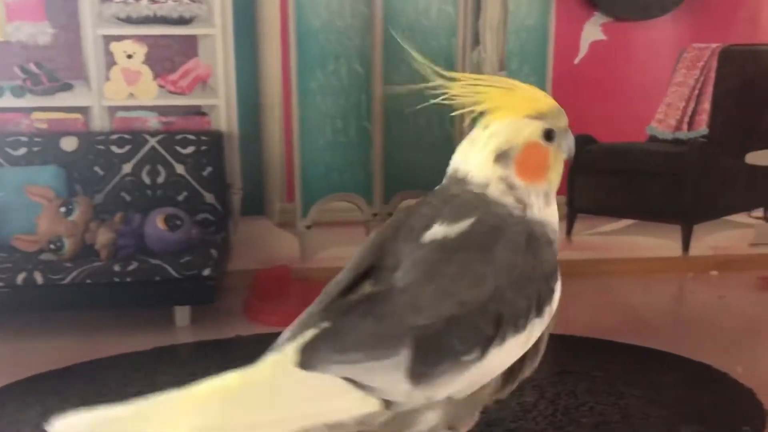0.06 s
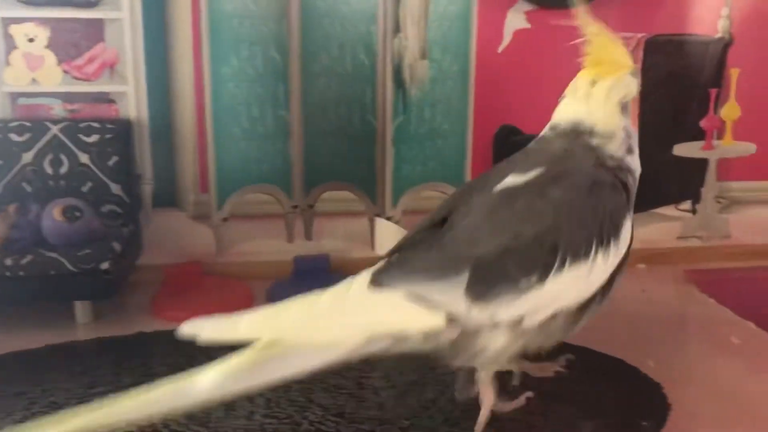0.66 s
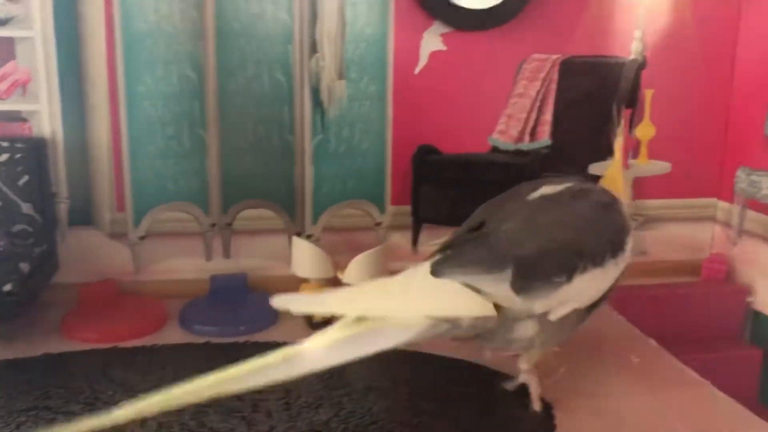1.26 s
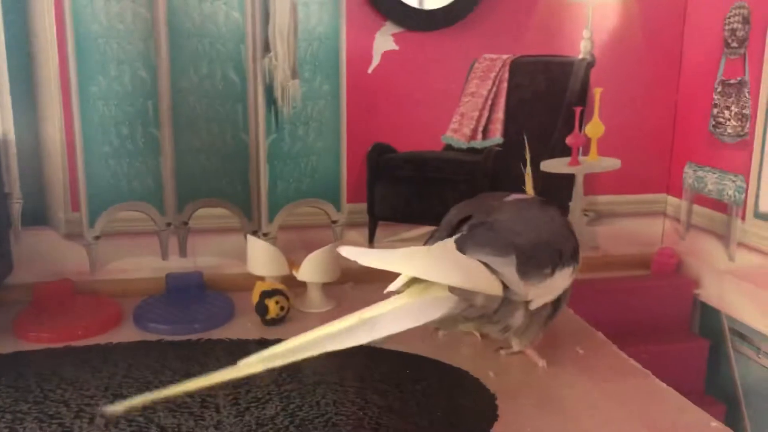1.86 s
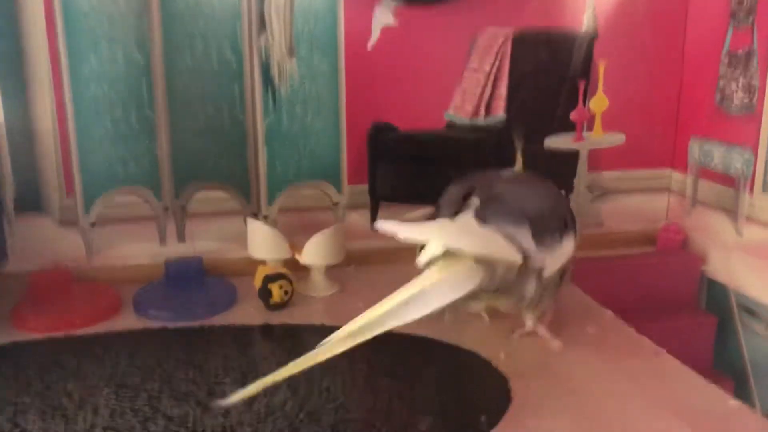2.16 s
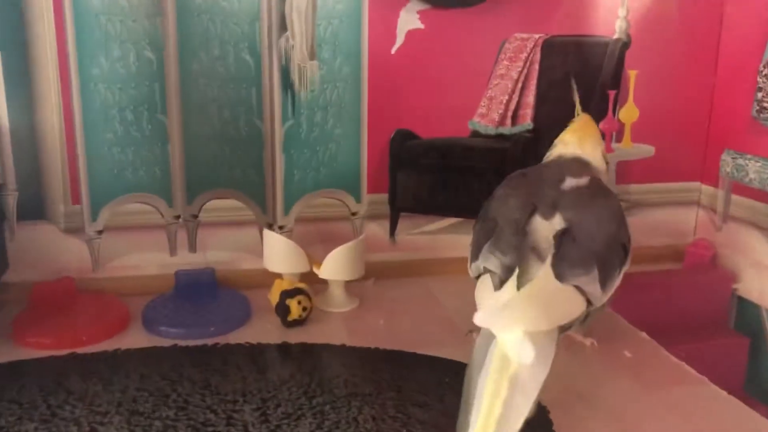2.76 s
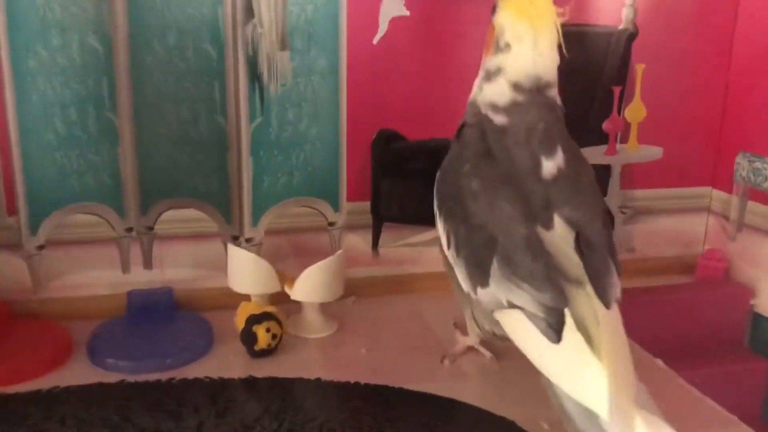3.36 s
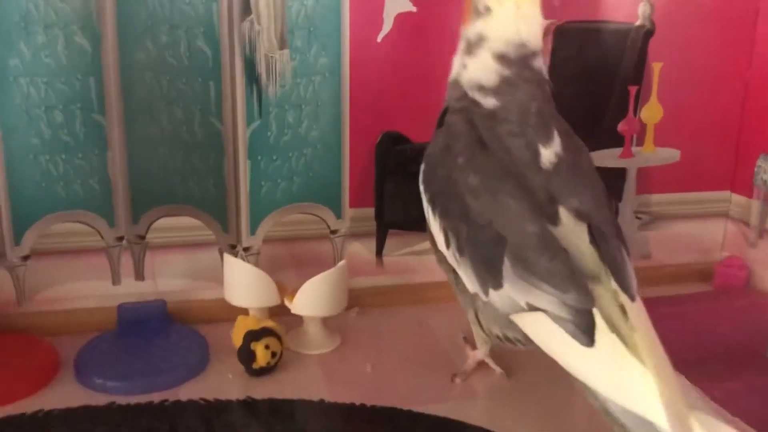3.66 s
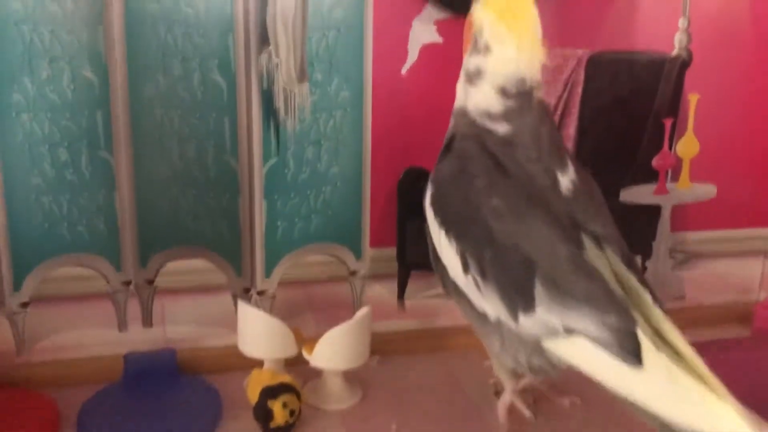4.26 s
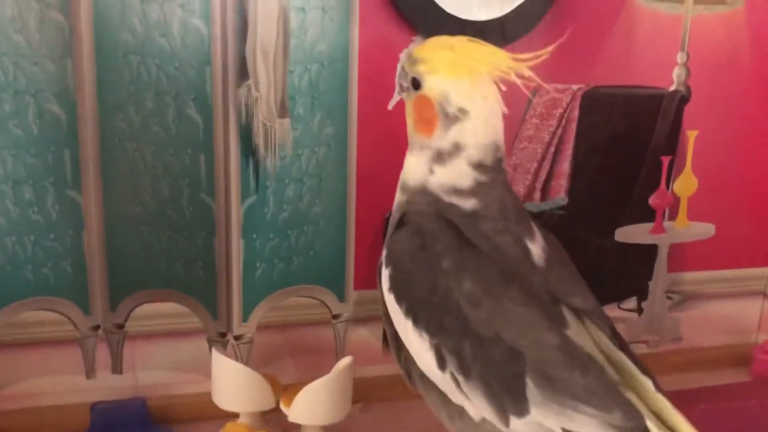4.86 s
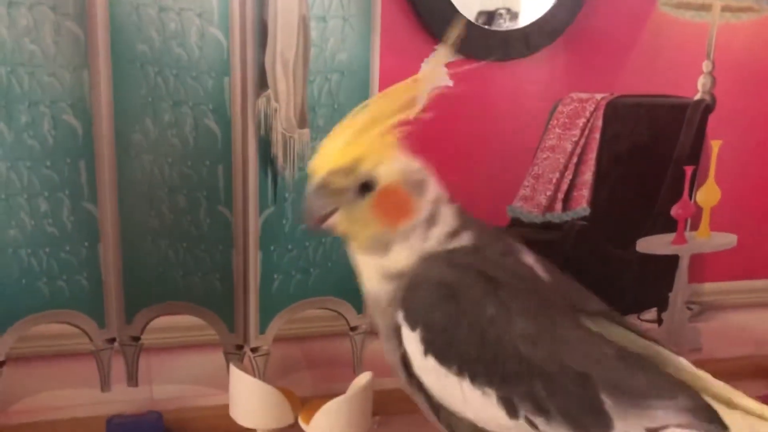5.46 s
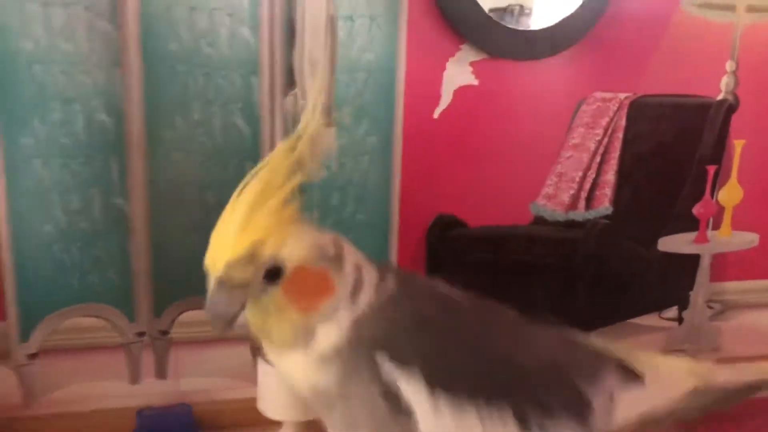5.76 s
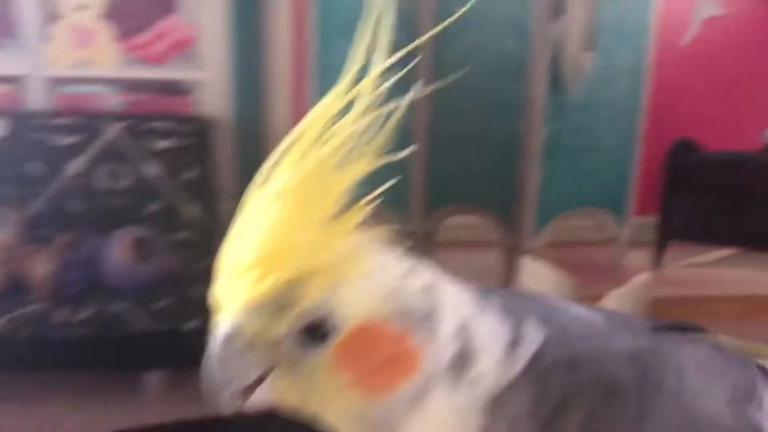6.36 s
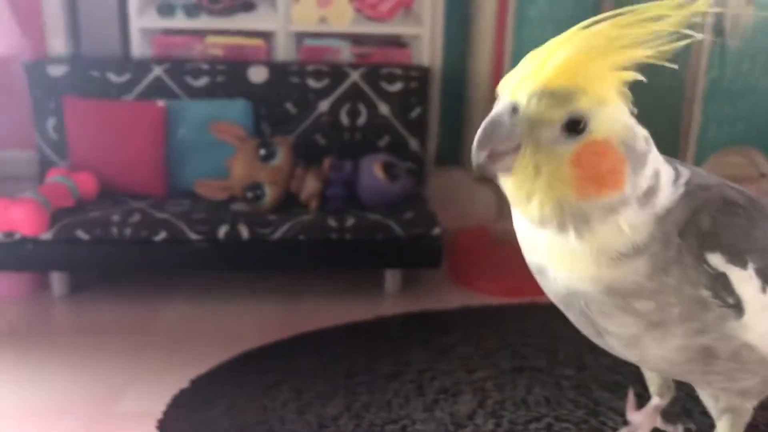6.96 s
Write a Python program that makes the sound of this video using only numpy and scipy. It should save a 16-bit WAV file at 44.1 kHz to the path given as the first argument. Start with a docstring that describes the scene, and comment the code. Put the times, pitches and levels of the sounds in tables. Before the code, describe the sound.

A cockatiel walks on a dollhouse's hard plastic floor, close to the microphone in a quiet room. Its claws make light, sharp ticks as they land and tiny scrapes as they lift, and each step faintly rings the hollow panel. From the start to about 1.6 seconds the taps come in quick, uneven clusters. They then thin out to single steps near 2.3, 3.1 and 3.8 seconds. Between 4.0 and 4.4 seconds the house shell gives a run of soft, low thumps, followed by a couple of ticks and a short lull. At about 5.5 seconds a claw clinks a small stiff toy, and the firmest steps and scratches follow until about 6.6 seconds. Among them, at 6.2 seconds, loose plastic gives one close, hollow knock. Low room tone, faint hiss and a slight room echo lie behind everything, until the end at about 7 seconds.

```python
"""Cockatiel in a dollhouse

A quiet room, the microphone close to a cockatiel walking on a dollhouse's hard plastic floor.
Its claws tick as they land and scrape as they lift; each foot's weight rings the floor panel.
Midway the house shell gives a run of soft thumps. Near the end a claw clinks a small stiff toy and
loose plastic gives a close, hollow knock. Behind it all lie the room's tail, low air and faint hiss."""
import sys
import numpy as np
from scipy import signal
from scipy.fft import rfft, irfft
from scipy.io import wavfile
from scipy.ndimage import uniform_filter1d

SR = 44100
rng = np.random.default_rng(int(sys.argv[2]) if len(sys.argv) > 2 else 0)


def wrap_up_sound(samples):
    """Save the sound to the file named by the first command line argument, as 16-bit audio."""
    columns = np.atleast_2d(samples).T
    # keep every value between -1 and 1, then stretch to whole-number steps
    tamed = np.clip(columns, -1, 1)
    steps = np.round(tamed * 32767).astype(np.int16)
    wavfile.write(sys.argv[1], SR, steps)


N = 313992

# steps, claw and weight landing together: start_s, claw_db, middle_re_claw_db, skid (0-1),
# early_toe_lead_s (0 for none), claw_ring_hz, weight_db, clack_re_weight_db, floor_hz
STEPS = [(0.1367, -63, -1.5, .2, 0, 4590, -55, 0, 394), (0.3427, -32, -14, .22, .007, 4100, -58.5, 4, 355),
         (0.5993, -36, -12, .33, .0163, 8900, -54.5, 1, 338),
         (0.8055, -31.5, -13, .42, .005, 7100, -58.5, 1, 328),
         (1.0866, -33, -15, .2, .0063, 3400, -59.5, 5, 340),
         (1.3954, -37.5, -13, .08, 0, 5660, -49, -.5, 330),
         (1.5755, -46.5, -6.5, .35, .0065, 4160, -41.5, 0, 375),
         (2.2686, -40, -12.5, .03, 0, 5700, -48, -2, 332), (3.0529, -37.5, -12, .3, 0, 6550, -63, 1.5, 352),
         (3.828, -32, -11, .03, 0, 4370, -70, 12, 358), (4.4444, -39, -15, .88, 0, 5400, -72, 0, 400),
         (4.464, -44, -2.5, .08, 0, 9100, -58, 3, 406), (5.531, -46, -4, .1, 0, 6800, -42.5, -9, 265),
         (5.5976, -28, -12, .95, 0, 5220, -45.5, -3, 268),
         (5.7715, -27.5, -10, .42, 0, 7300, -44.5, -4, 268),
         (5.9897, -28.5, -12.5, .9, 0, 5560, -52, 4.5, 307),
         (6.1737, -30, -9.5, .33, .0108, 1980, -66, 0, 310),
         (6.4182, -32.5, -10, .27, .0088, 3980, -49, .5, 322),
         (6.6725, -64, -4, .2, 0, 4700, -54, 1.5, 434)]
# a sole settling without its claws: start_s, weight_db, clack_re_weight_db, floor_hz
SOLES = [(0.206, -68, 7, 418), (2.298, -52, 1.5, 450), (3.07, -63, 3.5, 312), (4.52, -65.5, -2, 352),
         (4.613, -66, -6, 274), (4.69, -66, -5, 326), (5.012, -71.5, 1.5, 330), (5.268, -56, -11, 280),
         (5.306, -68, 2, 368)]
# a lone claw tip touching, no weight on it: start_s, level_db, skid (0-1)
TOUCHES = [(0.11, -64, .35), (0.4377, -48.5, .45), (0.607, -44, .17), (0.655, -57, .15), (0.885, -57, .08),
           (1.1152, -54.5, .25), (1.2992, -49.5, .17), (1.383, -66, .15), (1.502, -63, .2),
           (2.2084, -53, .05), (2.986, -56, .07), (3.8434, -43.5, .45), (4.013, -72, .3), (4.267, -70, .3),
           (4.5051, -57.5, .25), (5.31, -70, .15), (5.642, -52.5, .7)]
# a lifting claw catches, then drags: start_s, length_s, rasp_db, middle_re_rasp_db (before trim), catch_db
DRAGS = [(0.233, .011, -52, -15, -55), (0.315, .024, -53.5, -21, -66), (0.429, .022, -55, -10, -59),
         (0.6769, .018, -51, -18, -45.5), (0.9015, .015, -53.5, -14.5, -64), (1.2896, .016, -58, -9, -50.5),
         (3.661, .046, -69.5, -9, -76), (3.7264, .028, -59, -15, -52), (4.317, .055, -67.5, -5.5, -75),
         (4.395, .013, -53, -13, -52), (4.945, .06, -74.5, 0, -78), (5.419, .011, -63, -6, -72),
         (5.4472, .022, -60, -1, -55), (5.618, .038, -55.5, -12, -64), (5.678, .04, -72, 11, -76),
         (5.776, .008, -35, -9.5, -48), (5.83, .016, -43.5, -14, -57), (6.0425, .012, -52, -18, -53),
         (6.283, .015, -51, -14, -46), (6.5552, .017, -51.5, -12, -52)]
# colour of a claw on plastic: frequency_hz, gain_db
CLAW_COLOUR = [(800, -9), (2000, 1), (3500, -3.5), (5000, -4), (7300, -1), (8300, -0.5), (10700, 3),
               (12500, -0.5), (14500, -2), (16000, -9.5)]
# modes of the floor panel: pitch_hz, level_db, t60_s
FLOOR_MODES = [(138.4, -9, 0.137), (199, -5, 0.13), (263.8, 1.5, 0.11), (300, -3, 0.083), (402.6, -6, 0.13),
               (465, -7.5, 0.11), (521, -6, 0.099), (615, -5.5, 0.091), (730, -5.5, 0.061),
               (826.6, -7.5, 0.097), (912, -5, 0.081), (1042, -5, 0.057), (1179, -10.5, 0.091),
               (1314, -8, 0.058), (1628, -11, 0.055), (1786, -23, .05)]
# soft bumps of the whole house: start_s, body_db, bass_re_body_db, click_db
THUMPS = [(3.977, -48.5, 1, -56.5), (4.052, -55, 4, -78), (4.143, -54, -3, -80), (4.219, -47, -2, -67),
          (4.302, -47, -6, -69), (4.335, -52.5, -15, -76)]
# modes of the house shell: pitch_hz, level_db, t60_s
SHELL_MODES = [(85, -5.5, 0.12), (113, -3.5, 0.14), (147, -8, .08), (179, 0, 0.11), (253, -3, 0.061),
               (339, -4, 0.049), (382, 0, 0.08), (534, -8, 0.073), (621, -1.5, 0.069), (699, -4.5, 0.063),
               (800, -1.5, 0.064), (920, -3, 0.092), (1240, -11, .05)]
# a claw catches a small stiff toy: start_s, gain_db
CLINK = (5.5256, -38)
# modes of that toy: pitch_hz, level_db, t60_s
CLINK_MODES = [(2340, -6.5, 0.078), (3400, -11, 0.058), (5850, -14, 0.048), (6640, -7.5, 0.071),
               (7900, -10, .04), (11980, 0, .03), (13450, -4, .03), (15600, 3, .03)]
# a hollow knock near the microphone: start_s, gain_db
KNOCK = (6.1748, -32.7)
# modes of the knocked plastic: pitch_hz, level_db, t60_s
KNOCK_MODES = [(298, -15, 0.12), (604, -8, 0.034), (700, -6.5, 0.058), (790, -0.5, .035), (870, 0.5, 0.048),
               (932, -1, 0.058), (1067, -0.5, 0.043), (1190, -4.5, 0.032), (1560, -0.5, 0.026),
               (1805, 2, 0.029), (1890, 0, 0.023), (2191, -11, 0.032), (2760, -6, 0.033)]
# decay of the room's tail: frequency_hz, t60_s
ROOM_DECAY = [(150, 0.7), (800, .5), (4000, 0.64), (9000, 0.4), (15000, .4)]
# level of the room's tail: frequency_hz, gain_db
ROOM_COLOUR = [(150, -5.5), (800, -13.5), (4000, -17.5), (9000, -21), (15000, -25.5)]
# spectrum of the room's air: frequency_hz, relative_db
AIR_COLOUR = [(15, -52), (25, -37), (48, -6.5), (86, -5), (116, -0.5), (165, -7), (200, -6.5), (235, -11.5),
              (352, -16.5), (587, -21), (710, -25.5), (769, -23.5), (1390, -33.5), (1680, -32),
              (15800, -46.5)]
# faint hiss that swells as the bird moves: time_s, level_db (before trim)
HISS_SWELL = [(0.0, -78), (0.18, -77), (0.54, -73), (1.09, -77), (1.47, -75), (1.7, -79), (2.97, -78),
              (3.9, -73), (4.0, -76), (4.26, -76), (4.38, -73), (4.7, -78), (5.31, -77), (5.49, -76),
              (5.65, -66), (6.9, -78), (7.12, -78)]

USUAL_WEIGHT_DB = -52  # an ordinary footfall
FAINT_DB = -54  # below this a claw's touch grows duller


def amp(db):
    """Decibels to gain."""
    return 10 ** (np.asarray(db) / 20)


def unit_rms(x, span_s=None):
    """Scales to rms 1 over the first span_s, or over all."""
    head = x if span_s is None else x[:int(span_s * SR)]
    return x / np.sqrt(np.mean(head ** 2) + 1e-20)


def curve_at(points, hz):
    """Reads a table on a log-frequency axis."""
    points_hz, values = np.transpose(points)
    return np.interp(np.log(hz + 1), np.log(points_hz), values)


def hump(hz, centre_hz, octaves):
    """A bell curve of height 1 on a log-frequency axis."""
    return np.exp(-(np.log2((hz + 1) / centre_hz) / octaves) ** 2)


def fade(t, t60):
    """Exponential decay, 60 dB in t60 seconds."""
    return np.exp(-np.log(1000) * t / t60)


def add(mix, start_s, sound):
    """Mixes a sound in at start_s."""
    part = mix[max(round(start_s * SR), 0):][:len(sound)]
    part += sound[:len(part)]


def band(x, lo_hz, hi_hz, order=3):
    """Causal band-pass."""
    sos = signal.butter(order, [lo_hz, min(hi_hz, .49 * SR)], "band", fs=SR, output="sos")
    return signal.sosfilt(sos, x)


def coloured(x, db_at, size=2048):
    """Minimum-phase filter whose gain in dB is db_at(hz)."""
    log_gain = np.log(amp(db_at(abs(np.fft.fftfreq(size, 1 / SR)))))
    taps = np.fft.ifft(np.exp(np.conj(signal.hilbert(log_gain)))).real
    return signal.fftconvolve(x, taps[:size // 2])[:len(x)]


def ring(modes, t, scatter_db, detune):
    """Modes struck at a random spot, which changes their weights and signs."""
    hz, db, t60 = np.transpose(modes)[:, :, None]
    weight, shift, side = rng.standard_normal((3, len(modes), 1))
    waves = np.sign(side) * np.sin(2 * np.pi * hz * (1 + detune * shift) * t)
    return (amp(db + scatter_db * weight) * fade(t, t60) * waves).sum(0)


def claw_contacts(toe_db=-12, toe_skid=.25, touch_skid=.16, light_middle_db=-12.5, click_ring_hz=3000):
    """Every claw strike and thump click: start_s, level_db, middle_re_treble_db, skid, ring_hz."""
    firm = [(s, db, middle_db, skid, hz) for s, db, middle_db, skid, _, hz, *_ in STEPS]
    early_toes = [(s - lead_s, db + toe_db, toe_skid) for s, db, _, _, lead_s, *_ in STEPS if lead_s > 0]
    catches = [(s, catch_db, touch_skid) for s, *_, catch_db in DRAGS]
    clicks = [(s, click_db, 3, touch_skid, click_ring_hz) for s, *_, click_db in THUMPS]
    light = []
    for start_s, db, skid in early_toes + TOUCHES + catches:
        middle_db = light_middle_db + .4 * max(FAINT_DB - db, 0)
        ring_hz = rng.choice(firm)[-1]  # rings like any one of the steps
        light.append((start_s, db, middle_db, skid, ring_hz))
    return firm + clicks + light


def claw_taps(chatter_s=.006, spike=19, rebound=.3, ripple_db=2, ring_db=6, walls_db=-16):
    """A hard tip strikes and chatters; dense plastic modes and the close walls smear it briefly."""
    out, t = np.zeros(N), np.arange(SR // 8) / SR
    grid_hz = np.linspace(1, SR / 2, 80)
    for start_s, db, middle_db, skid, ring_hz in claw_contacts():
        clean = (1 - skid) ** 5  # a clean hit is sharper and brighter than a skid
        sharpness = .1 + .55 * clean
        db_per_octave = 2.2 + 5.3 * clean - .45 * max(FAINT_DB - db, 0)
        tilt = lambda hz: db_per_octave * np.log2(np.maximum(hz, 5000) / 9000)
        # each claw and spot has one clear resonance among lesser peaks and dips
        ripple = np.column_stack([grid_hz, ripple_db * rng.standard_normal(len(grid_hz))])
        spot = lambda hz: curve_at(ripple, hz) + ring_db * hump(hz, ring_hz, octaves=.07)
        after_chatter = np.maximum(t - chatter_s * skid, 0)
        smear = fade(after_chatter, t60=.021) + amp(walls_db) * fade(after_chatter, t60=.06)
        crack = 7 * sharpness ** 2 * fade(t, t60=.002)
        tick = rng.standard_normal(len(t)) * (smear + crack)
        tick[:2] += spike * sharpness * np.array([1, -.9])  # first contact: a push and its release
        add(tick, rng.uniform(.0006, .003), rebound * tick)
        tick = coloured(tick, lambda hz: curve_at(CLAW_COLOUR, hz) + spot(hz) + tilt(hz))
        middle = rng.standard_normal(len(t)) * fade(after_chatter, t60=.051)
        middle[0] += spike * sharpness / 2
        middle = coloured(middle, spot)
        add(out, start_s, amp(db) * unit_rms(band(tick, 4440, 20000), span_s=.006))
        add(out, start_s, amp(db + middle_db) * unit_rms(band(middle, 1280, 5580), span_s=.0047))
    return out


def claw_scrapes(slips_per_s=2500, spread_db=3, middle_trim_db=-1):
    """A dragged claw slips in many tiny clicks, each ringing the plastic briefly."""
    out = np.zeros(N)
    for start_s, length_s, db, middle_db, _ in DRAGS:
        t = np.arange(int((length_s + .05) * SR)) / SR
        sizes = amp(spread_db * np.minimum(rng.exponential(1, len(t)), 4)) * rng.choice([-1, 1], len(t))
        slips = sizes * (rng.random(len(t)) < slips_per_s / SR) * (t < length_s)
        plastic = rng.standard_normal(len(t)) * fade(t, t60=.037)
        plastic[0] += 8  # the slip's own click
        rasp = signal.fftconvolve(slips, plastic)[:len(t)]
        treble = band(coloured(rasp, lambda hz: curve_at(CLAW_COLOUR, hz)), 3000, 20000)
        middle = band(rasp, 650, 3300)
        add(out, start_s, amp(db) * unit_rms(treble, length_s))
        add(out, start_s, amp(db + middle_db + middle_trim_db) * unit_rms(middle, length_s))
    return out


def floor_loads(soft_hz=760, hard_hz=1180, hard_margin_db=15.5, sag_octaves_per_db=.015):
    """Every load on the floor: start_s, weight_db, clack_re_weight_db, floor_hz, clack_hz."""
    steps = []
    for start_s, claw_db, *_, weight_db, clack_db, floor_hz in STEPS:
        # a heavier step clacks lower, but one led by its claw clacks high
        sagged_hz = soft_hz * 2 ** (-sag_octaves_per_db * (weight_db - USUAL_WEIGHT_DB))
        clack_hz = hard_hz if claw_db - weight_db > hard_margin_db else sagged_hz
        steps.append((start_s, weight_db, clack_db, floor_hz, clack_hz))
    return steps + [(*sole, soft_hz) for sole in SOLES]


def blow(sound, body_db, bass_db, clack_db):
    """The softness of the contact shares a blow out: bass and clack are set relative to the body."""
    registers = [(bass_db, band(sound, 65, 195)), (0, band(sound, 186, 618)),
                 (clack_db, band(sound, 560, 1830))]
    return amp(body_db) * sum(amp(db) * unit_rms(part, span_s=.027) for db, part in registers)


def footfalls(weak_gain=.68, press_s=.0015, floor_lift_db=8.5, clack_lift_db=5, octaves=.42):
    """The bird's weight rings the floor panel: strong modes among many weak ones, favoured by the spot."""
    out, t = np.zeros(N), np.arange(SR // 3) / SR
    for start_s, db, clack_db, floor_hz, clack_hz in floor_loads():
        bass_db = -8.5 - .45 * (db - USUAL_WEIGHT_DB)  # heavier steps favour the body
        weak = band(rng.standard_normal(len(t)), 207, 1300, order=1) * fade(t, t60=.088)
        strong = ring(FLOOR_MODES, t, scatter_db=1.5, detune=.017)
        panel = unit_rms(strong) + weak_gain * unit_rms(weak)
        panel *= 1 - np.exp(-t / press_s)  # the padded toe takes a moment to press
        spot = lambda hz: (floor_lift_db * hump(hz, floor_hz, octaves)
                           + clack_lift_db * hump(hz, clack_hz, octaves))
        add(out, start_s, blow(coloured(panel, spot), db, bass_db, clack_db))
    return out


def house_thumps(settle_s=.0115, settle_gain=.46, rattle_gain=.32):
    """The shell is bumped at one spot; each time it settles with a second bump and loose parts rattle."""
    out, t = np.zeros(N), np.arange(SR // 3) / SR
    shell = unit_rms(ring(SHELL_MODES, t, scatter_db=1, detune=.004))
    for start_s, db, bass_db, _ in THUMPS:
        rattle = band(rng.standard_normal(len(t)), 100, 1300, order=1) * fade(t, t60=.12)
        bump = shell + rattle_gain * unit_rms(rattle)
        add(bump, settle_s * rng.uniform(.916, 1.094), settle_gain * shell)
        add(out, start_s, blow(bump, db, bass_db, clack_db=-9.5))
    return out


def struck_plastic(event, modes):
    """One hard blow on a loose piece of plastic, too small to radiate bass."""
    out, t = np.zeros(N), np.arange(SR // 4) / SR
    start_s, db = event
    piece = ring(modes, t, scatter_db=-1, detune=.0023)
    add(out, start_s, amp(db) * band(piece, 300, 20000, order=2))
    return out


def fidgets(ticks_per_s=12, softest_db=-77.5, spread_db=2.2):
    """Toes and feathers keep making ticks, barely audible even this close."""
    t = np.arange(SR // 16) / SR
    onsets = rng.random(N) < ticks_per_s / SR
    sizes = amp(softest_db + spread_db * np.minimum(rng.exponential(1, N), 3))
    burst = rng.standard_normal(len(t)) * fade(t, t60=.035)
    tick = band(coloured(burst, lambda hz: curve_at(CLAW_COLOUR, hz) / 2), 1000, 20000)
    return signal.fftconvolve(onsets * sizes, unit_rms(tick, span_s=.0045))[:N]


def shuffle(stroke_db=3, stroke_s=.025, rest_db=-83, step_db=-75, follow=.55, rise_t60=.15, fall_t60=1.3):
    """Dull, uneven brushing carried by the floor panel; it swells around each shift of weight."""
    t, knots = np.arange(N) / SR, np.arange(0, N / SR, stroke_s)
    brush = unit_rms(band(rng.standard_normal(N), 350, 1400, order=2))
    strokes = np.interp(t, knots, rng.standard_normal(N)[:len(knots)])
    swells = []
    for start_s, db, *_ in floor_loads() + THUMPS:
        peak = amp(step_db + follow * (db - USUAL_WEIGHT_DB))
        t60 = np.where(knots < start_s, rise_t60, fall_t60)
        swells.append(peak * fade(abs(knots - start_s), t60))
    level = np.hypot(amp(rest_db), np.linalg.norm(swells, axis=0))
    return np.interp(t, knots, level) * amp(stroke_db * strokes) * brush


def room_tail(onset_s=.012):
    """A diffuse tail that builds up after the direct sound, each band dying at its own speed."""
    hz, t, noise = signal.stft(rng.standard_normal(SR), SR, nperseg=256)
    t60 = curve_at(ROOM_DECAY, hz)[:, None]
    unit_energy = np.sqrt(2 * np.log(1000) / (t60 * SR))
    colour = amp(curve_at(ROOM_COLOUR, hz))[:, None]
    tail = signal.istft(noise * fade(t, t60) * unit_energy * colour, SR, nperseg=256)[1]
    return tail * (1 - np.exp(-np.arange(len(tail)) / (onset_s * SR)))


def room_scatter(x, directions=3):
    """Successive instants of a hit leave in different directions, and each meets another tail."""
    direction = np.arange(N) // 64 % directions
    shares = [uniform_filter1d(1. * (direction == k), size=32) for k in range(directions)]
    return sum(signal.fftconvolve(x * share, room_tail())[:N] for share in shares)


def room_air(level_db=-63.5, hiss_trim_db=-3.8):
    """Room tone at the microphone: steady low noise under a faint, swelling hiss."""
    colour = amp(curve_at(AIR_COLOUR, np.fft.rfftfreq(N, 1 / SR)))
    steady = unit_rms(irfft(rfft(rng.standard_normal(N)) * colour, N))
    swell = amp(np.interp(np.arange(N) / SR, *np.transpose(HISS_SWELL)) + hiss_trim_db)
    hiss = unit_rms(band(rng.standard_normal(N), 2500, 16000, order=1))
    return amp(level_db) * steady + swell * hiss


def scene(knock_wet=.57):
    """Bird, house and room at one microphone; the knock is close and so drier."""
    claws = claw_taps() + claw_scrapes() + fidgets() + struck_plastic(CLINK, CLINK_MODES)
    house = footfalls() + house_thumps()
    knock = struck_plastic(KNOCK, KNOCK_MODES)
    reverb = room_scatter(claws) + signal.fftconvolve(house + knock_wet * knock, room_tail())[:N]
    return (claws + house + knock + reverb + shuffle() + room_air())[None]


def record(dry):
    """The recorder's band limit: a steep low-pass near 16 kHz."""
    lowpass = signal.firwin(255, 16050, window=("kaiser", 9), fs=SR)
    return signal.oaconvolve(dry, lowpass[None], "same")


dry = scene()
out = record(dry)
wrap_up_sound(out)
```